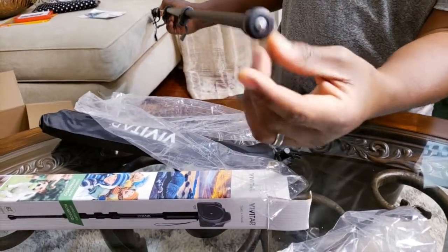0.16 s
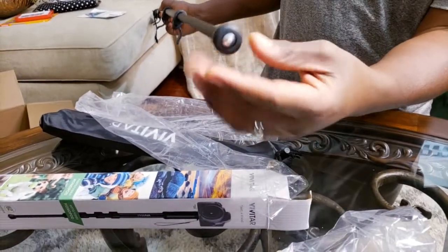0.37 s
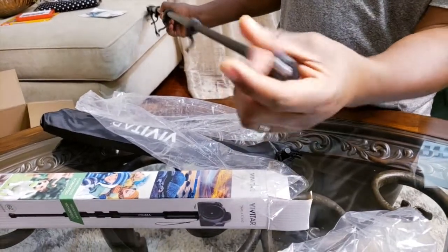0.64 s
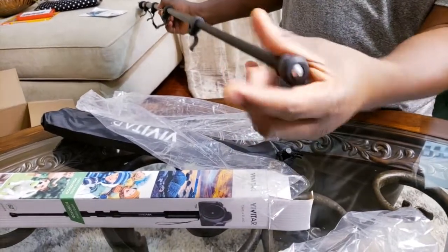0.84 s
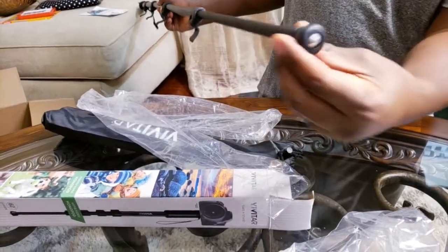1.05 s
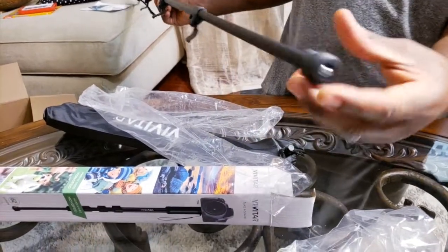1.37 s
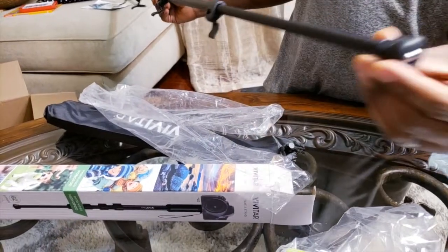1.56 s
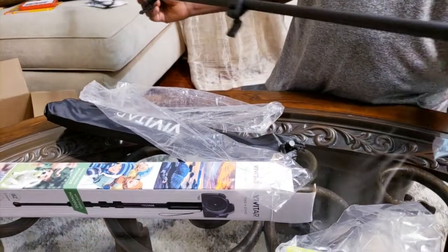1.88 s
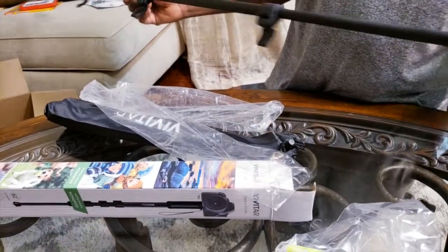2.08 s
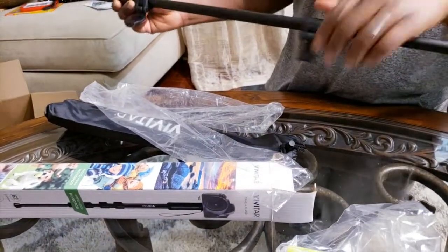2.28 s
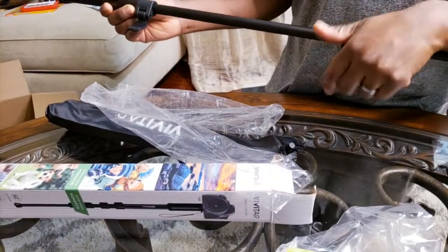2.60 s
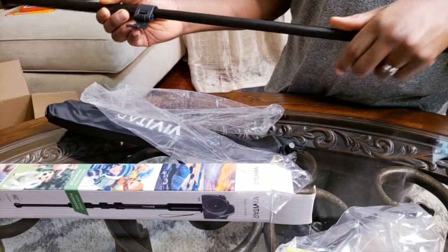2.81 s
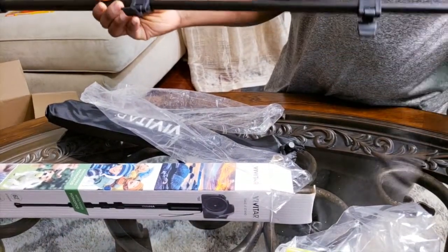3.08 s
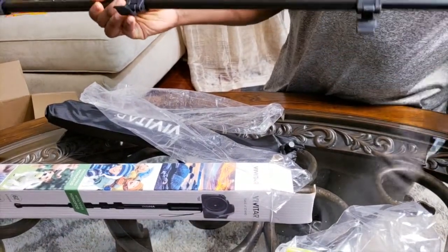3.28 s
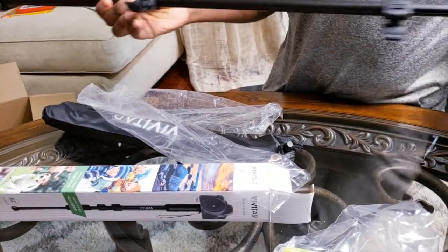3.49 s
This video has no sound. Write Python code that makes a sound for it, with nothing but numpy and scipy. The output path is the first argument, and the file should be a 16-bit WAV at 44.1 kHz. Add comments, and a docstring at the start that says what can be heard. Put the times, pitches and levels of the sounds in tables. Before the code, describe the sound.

Telescoping metal pole handled indoors, clamps clicking and rattling, then a section slides out loudly

```python
"""A furnished room, with a telescoping metal pole handled a little right of a pair of microphones.
Clamps and joints click and chatter: noisy contacts ring short modes. Taps sound the modes of a collar.
One section grinds briefly and fingers brush the tube: slips make noise with flickering resonances.
At last a section slides out with a loud hiss and rasp, and clacks against its stop.
A low hum, a sine with a drone of filtered noise, wavers underneath with quiet room noise."""
import sys
import numpy as np
from scipy import signal
from scipy.fft import rfft, irfft, next_fast_len
from scipy.io import wavfile
from scipy.ndimage import uniform_filter1d, map_coordinates

SR = 44100
rng = np.random.default_rng(int(sys.argv[2]) if len(sys.argv) > 2 else 0)


def transcribe(u):
    """Save the signal u as a 16-bit wav file named by the first command-line argument.

    u: samples, shape (n,) or (channels, n), limited to [-1, 1]; the rate is SR.
    q: integer samples, one column per channel.
    """
    v = np.clip(np.atleast_2d(u).T, -1, 1)
    q = np.round(v * 32767).astype(np.int16)
    wavfile.write(sys.argv[1], SR, q)


N = 160965


def amp(db):
    """Decibels to gain."""
    return 10 ** (np.asarray(db) / 20)


def unit(x):
    """Scaled to rms 1."""
    return x / np.sqrt(np.mean(x ** 2) + 1e-20)


def along(points, hz):
    """(freq_hz, value) points read on a log frequency axis."""
    point_hz, values = np.transpose(points)
    return np.interp(np.log(hz + 1), np.log(point_hz + 1), values)


def levels(rows, outside=None):
    """One gain per sample for each dB column after the time."""
    time_s, *columns = np.transpose(rows)
    t = np.arange(N) / SR
    return [amp(np.interp(t, time_s, column, outside, outside)) for column in columns]


def wobble(rate, size=N):
    """A smooth random curve, rate knots a second up to SR / 5."""
    knots = rng.standard_normal(size // 4)
    return map_coordinates(knots, [np.arange(size) * min(rate / SR, 1 / 5)], mode='wrap')


def pan(db):
    """Left and right gains of constant total power, db apart."""
    return unit(amp([[db / 2], [-db / 2]]))


def filtered(x, response):
    """x times a response of frequency."""
    size = x.shape[-1]
    padded = next_fast_len(size + 4096)
    spectrum = rfft(x, padded) * response(np.fft.rfftfreq(padded, 1 / SR))
    return irfft(spectrum, padded)[..., :size]


def causal(db):
    """The minimum-phase response with this gain, by folding the cepstrum."""
    cepstrum = irfft(np.log(amp(db)))
    half = len(cepstrum) // 2
    cepstrum[1:half] *= 2
    cepstrum[half + 1:] = 0
    return np.exp(rfft(cepstrum))


def resonance(f, hz, width):
    """One damped mode, with unit gain at its centre."""
    return 1j * f * width / (hz * hz - f * f + 1j * f * width)


def noise(spectrum):
    """Steady stereo noise of rms 1."""
    return unit(filtered(rng.standard_normal((2, N)), lambda f: amp(along(spectrum, f))))


def friction(colour, streak_db, rough, slip_rate):
    """Stereo friction of rms 1: tiny slips excite narrow resonances that come and go."""
    slips = rng.standard_normal((2, N)) * np.exp(rough * wobble(slip_rate))
    f, t, z = signal.stft(slips, SR, nperseg=512)
    # partly shared by both ears, smoothed over frequency and then time
    field = rng.standard_normal(z.shape[1:]) + .5 * rng.standard_normal(z.shape)
    field = uniform_filter1d(uniform_filter1d(field, size=3, axis=1), size=9, axis=2)
    streaks = amp(streak_db * unit(field))
    return unit(signal.istft(z * colour(f[:, None], t) * streaks, nperseg=512)[1][:, :N])


def shaped(spectrum):
    """A colour that stays the same over time."""
    return lambda f, t: amp(along(spectrum, f))


# Decay of the furnished room: freq_hz, t60_s
ROOM_DECAY = [(300, 0.39), (2000, 0.16), (5000, 0.18), (9000, 0.16), (15000, 0.15)]
ROOM_BUILD_S = 0.0013


def room(x):
    """A short diffuse tail for each ear; the lowest tones die last."""
    f, t, z = signal.stft(rng.standard_normal((2, SR // 3)), SR, nperseg=256)
    decay = amp(-60 * t / along(ROOM_DECAY, f)[:, None])
    tail = signal.istft(z * decay, SR, nperseg=256)[1]
    tail = tail * (1 - np.exp(-np.arange(tail.shape[1]) / SR / ROOM_BUILD_S))
    tail = tail / np.linalg.norm(tail[0])
    return signal.fftconvolve(np.atleast_2d(x), tail, axes=1)[:, :x.shape[-1]]


# Swells of the low hum: peak_s, level_db
HUM_SWELLS = [(1.02, -72.5), (1.321, -66), (1.92, -61), (2.298, -67.5), (2.491, -62.5), (2.88, -66),
              (3.34, -62.5), (3.58, -68.5)]
# Colour of the noisy drone within the hum: freq_hz, gain_db
DRONE_COLOUR = [(60, -32.5), (130, 4.5), (220, 10), (340, 7), (450, -25), (900, -54)]
# Colour of the quiet room noise: freq_hz, gain_db
ROOM_NOISE_COLOUR = [(25, -30.5), (50, -10.5), (80, 0.5), (200, 4.5), (350, 4), (550, 0), (1500, -4),
                     (4000, -9.5), (9000, -18.5), (15500, -17.5)]
SWELL_S, HUM_REST_DB, HUM_PAN_DB = 0.12, -82, -3.5
HUM_HZ, HUM_WANDER_HZ, SUBHUM_DB, DRONE_DB = 158.8, 0.6, -16, -6.5
FLOOR_DB, FLOOR_SIDE_DB = -74.5, -1


def background():
    """A low hum swells and fades, with a faint lower octave, over quiet room noise."""
    t = np.arange(N) / SR
    swells = sum(amp(db) * np.exp(-((t - s) / SWELL_S) ** 2) for s, db in HUM_SWELLS)
    phase = 2 * np.pi * np.cumsum(HUM_HZ + HUM_WANDER_HZ * wobble(3.6)) / SR
    tone = unit(np.sin(phase))
    drone = amp(DRONE_DB) * noise(DRONE_COLOUR)[0]
    lower_octave = amp(SUBHUM_DB + 3.5 * wobble(3.5)) * np.sin(phase / 2)
    hum = (amp(HUM_REST_DB) + swells) * (tone + drone + lower_octave)
    mid, side = amp(FLOOR_DB) * noise(ROOM_NOISE_COLOUR)
    return hum * pan(HUM_PAN_DB) + mid + amp(FLOOR_SIDE_DB) * np.array([side, -side])


# Strokes of the fingers: start_s, hold_s, level_db, left_minus_right_db, rub_db (relative to the skin)
FINGER_STROKES = [(.505, 0.135, -49.5, 2, -26), (0.552, 0.019, -59, -5, -5), (0.735, 0.063, -55, 5.5, -24),
                  (0.824, 0.083, -61.5, 3, -10), (0.907, 0.2, -48, 2, -12), (1.538, 0.069, -47, -3, -7),
                  (2.004, 0.018, -70.5, 8, -20), (2.218, 0.028, -32, -4, -22.5),
                  (2.258, 0.029, -34.5, -5.5, -21.5), (2.422, 0.011, -54.5, -1, -16),
                  (2.498, 0.061, -61, -13.5, -18), (2.58, 0.14, -54.5, -14.5, -9),
                  (2.689, 0.074, -51, -3, -10.5), (2.781, 0.067, -49.5, -14.5, -17),
                  (3.094, 0.047, -34.5, -9.5, -29.5), (3.13, 0.061, -55.5, -12, -12.5)]
# Colour of the very high skin sound: freq_hz, gain_db
SKIN_COLOUR = [(6000, -43.5), (8800, -22), (9600, -3), (10400, -11), (11400, -1), (13000, 0.5), (15600, 0)]
# Colour of the lower rub: freq_hz, gain_db
RUB_COLOUR = [(1200, -15), (4600, -9.5), (5500, -0.5), (6200, 4.5), (6900, 1), (7800, 0), (8500, -26.5),
              (12000, -33.5)]
BRUSH_ATTACK_S, BRUSH_RELEASE_S = 0.0066, 0.0062


def fingers():
    """Skin brushes the tube in soft, very high strokes, by friction."""
    t, x = np.arange(N) / SR, np.zeros((2, N))
    skin = friction(shaped(SKIN_COLOUR), streak_db=6.0, rough=0.28, slip_rate=1800)
    rub = friction(shaped(RUB_COLOUR), streak_db=3, rough=.4, slip_rate=800)
    for s, hold_s, db, pan_db, rub_db in FINGER_STROKES:
        rise = np.maximum(s - t, 0) / BRUSH_ATTACK_S
        fall = np.maximum(t - s - hold_s, 0) / BRUSH_RELEASE_S
        x += amp(db) * np.exp(-rise - fall) * pan(pan_db) * (skin + amp(rub_db) * rub)
    return x + amp(-7.0) * room(x)


# Loudness of the short grind: time_s, level_db
GRIND_LEVEL = [(.995, -66.5), (1.008, -41.5), (1.037, -34.5), (1.055, -40.5), (1.075, -29), (1.112, -38.5),
               (1.13, -62.5)]
# Colour of the grind: freq_hz, gain_db
GRIND_SPECTRUM = [(80, -72), (800, -28), (1300, -12.5), (2200, -6.5), (2650, 11.5), (3300, -11), (4250, 3),
                  (5200, -7.5), (7000, -6.5), (9000, -10)]
GRIND_PAN_DB = 2


def grind():
    """A section shifts in its collar with coarse slips."""
    level, = levels(GRIND_LEVEL, -np.inf)
    x = level * friction(shaped(GRIND_SPECTRUM), streak_db=3, rough=.5, slip_rate=1200)
    x = x * pan(GRIND_PAN_DB)
    return x + amp(3.0) * room(x)


CRACK_S, CHATTER_ROUGH, LEFT_LAG_S = 0.0026, 0.33, .0001
CLICK_GAIN_DB, CLICK_ROOM_DB = 20, -2


def contact(body, s, db, chatter_s, pan_db):
    """One contact chatters up to a sharp crack and sounds a body (a response of frequency) in the room."""
    size, lead = 16384, 2048  # samples in all, and before the hit
    t, f = (np.arange(size) - lead) / SR, np.fft.rfftfreq(size, 1 / SR)
    envelope = np.exp(-np.abs(t) / np.where(t < 0, max(chatter_s, 1 / SR), CRACK_S))
    force = envelope * rng.standard_normal(size) * np.exp(CHATTER_ROUGH * wobble(3000, size=size))
    force /= np.linalg.norm(force)
    force[lead] += 0.5 * CRACK_S / (CRACK_S + chatter_s)  # a clean snap has one main impact
    hit = rfft(force) * body(f)
    hit *= amp(db + CLICK_GAIN_DB) / np.linalg.norm(irfft(hit))
    ears = np.exp(1j * np.pi * f * LEFT_LAG_S * np.array([[-1], [1]]))
    direct = pan(pan_db) * irfft(hit * ears)
    reflected = amp(CLICK_ROOM_DB) * pan(pan_db / 2) * room(irfft(hit))
    out, start = np.zeros((2, N + 2 * size)), max(round(s * SR), 0)
    out[:, start:start + size] = direct + reflected
    return out[:, lead:lead + N]


TREBLE_EDGE_HZ = 9140  # of the taps and of the joints
# Taps of the hand on a clamp collar:
# hit_s, level_db (before the click gain), chatter_s (rise before the hit), left_minus_right_db
COLLAR_TAPS = [(2.379, -43.5, 0.013, -2), (2.393, -60, 0.0012, 9), (2.7926, -38, .001, 9)]
# Short modes of the collar: freq_hz, width_hz, gain_db
COLLAR_MODES = [(1625, 127, 0.5), (3640, 300, 8), (5570, 310, 0), (6120, 210, -3)]


def taps():
    """Light, dull taps sound the few short modes of a collar."""
    def collar(f):
        modes = sum(amp(db) * resonance(f, hz, width) for hz, width, db in COLLAR_MODES)
        return modes / (1 + (f / TREBLE_EDGE_HZ) ** 10)
    return sum(contact(collar, s, db, chatter_s, pan_db) for s, db, chatter_s, pan_db in COLLAR_TAPS)


# Colour of the broad crack of a joint: freq_hz, gain_db
CRACK_COLOUR = [(100, -55), (750, -34.5), (1150, -23), (1600, -12), (2150, -10), (2700, -1.5), (4300, -0.5),
                (7300, -3.5), (9500, -8.5), (11000, -15), (15500, -12)]
# Ringing modes of the tube: freq_hz, width_hz, gain_db
TUBE_MODES = [(1663, 24, 6), (2670, 40, 6), (4168, 24, 10), (4307, 40, 13), (4540, 40, 13), (6050, 30, 5)]
BASS_EDGE_HZ, KNOCK_WIDTH_HZ, SECOND_KNOCK_DB = 2000, 120, -11.5


def joint(f, bass_db, treble_db, knock_hz, second_hz, knock_db, ring_db):
    """A clamp or joint: a broad crack, two hollow knocks of its own and the ring of the tube."""
    tube = sum(amp(db) * resonance(f, hz, width) for hz, width, db in TUBE_MODES)
    bass = 1 / (1 + (f / BASS_EDGE_HZ) ** 8)
    treble = 1 - 1 / (1 + (f / TREBLE_EDGE_HZ) ** 20)
    crack = causal(along(CRACK_COLOUR, f) + bass_db * bass + treble_db * treble)
    second_knock = amp(SECOND_KNOCK_DB) * resonance(f, second_hz, 2 * KNOCK_WIDTH_HZ)
    knock = resonance(f, knock_hz, KNOCK_WIDTH_HZ) + second_knock
    return crack * (1 + amp(knock_db) * knock + amp(ring_db) * tube)


# Contacts of clamps and joints:
# hit_s, level_db (before the click gain), chatter_s (rise before the hit), left_minus_right_db,
# bass_db, treble_db, knock_hz, second_knock_hz, knock_db, tube_ring_db
JOINT_CLICKS = [(0.0346, -40, 0.00017, -19, -19, -18, 3700, 7260, -6, -24),
                (0.055, -35.5, 0.027, -4, -13, -4, 2560, 4330, -1, -26),
                (0.058, -33.5, 0.0015, -13, -1, -2, 6180, 4570, 21, -17),
                (.304, -37, 0.0056, -0.5, -10, -3, 4300, 6200, 19, -18),
                (0.315, -36.5, 0.003, -4, -1, -7, 4500, 2600, 7, -1),
                (0.894, -41.5, 0.0026, -13, 4, -17, 2630, 5600, 21, -19),
                (0.913, -40, 0.00033, -4, -7.5, -28, 2440, 4260, 29, -17),
                (1.012, -26, 0.0061, -16, -2, 1, 2800, 6000, 17, -6),
                (1.045, -29, .0003, -20, -18, 1, 2560, 5840, 3, -14),
                (1.061, -22.5, 0.00068, -9, -11, -6, 2687, 6315, 1, -12),
                (1.0759, -19, 0.00026, -1, 2, 4, 2660, 7370, -2, -22),
                (1.0829, -17, 0.00054, 7, 2, 0, 3563, 6893, 9, -7),
                (1.0872, -14, 0.0015, -5, 5.5, -1, 4200, 2635, 0.5, 1),
                (1.093, -21, 0.00033, -20, 15, 8, 2843, 1675, -1, 4),
                (1.097, -23, .0004, 3, 2.5, -2, 1726, 6640, 11.5, -8.5),
                (1.1054, -25, .0005, -7.5, 5, -3.5, 4330, 1601, 16.5, -9),
                (1.2638, -29.5, 0.00028, -11, -4, -13, 4400, 2730, 2, 8),
                (1.308, -31.5, 0.00028, -1.5, -11, -4, 4260, 2510, 25, -4),
                (1.324, -32, 0.013, -0.5, 0, 5.5, 2500, 4200, 1, 7),
                (1.538, -26.5, 0.0069, 1, -1.5, -16, 2570, 4210, 34.5, -18),
                (1.545, -24.5, 0.00077, -0.5, -6, -23.5, 2770, 4300, 35.5, -17.5),
                (1.566, -31, 0.0035, -4, 11, 2, 2830, 4550, 13.5, -7.5),
                (2.2152, -34, .0008, -7.5, 8.5, -3, 2634, 1615, 14.5, -24.5),
                (2.2182, -30, 0.00078, -4.5, 8.5, 7, 3320, 4300, 9.5, -2),
                (3.5409, -22, 0.000064, -19, 5, -12, 6350, 1800, 25, -13),
                (3.551, -26, 0.0004, -14, 8.5, 22.5, 1780, 5650, 17, -27),
                (3.5679, -23, 0.00028, -4.5, 6.5, 0.5, 4330, 7600, 11.5, -32)]


def clicks():
    """Clamps snap, joints rattle and sections strike their stops."""
    x = np.zeros((2, N))
    for s, db, chatter_s, pan_db, *timbre in JOINT_CLICKS:
        x += contact(lambda f: joint(f, *timbre), s, db, chatter_s, pan_db)
    return x


# Loudness of the long slide: time_s, hiss_level_db, rasp_level_db
SLIDE_LEVELS = [(3.21, -59, -74), (3.232, -46, -55), (3.25, -19, -27.5), (3.3, -19, -32),
                (3.345, -18.5, -32.5), (3.405, -22.5, -36), (3.47, -20, -36.5), (3.53, -26.5, -32.5),
                (3.57, -20, -23.5), (3.582, -45, -69), (3.65, -53, -59)]
# Colour of the bright hiss: freq_hz, gain_db
HISS_COLOUR = [(3000, -56), (8000, -9), (8950, -14.5), (9450, 3.5), (10000, -1), (10600, 3.5), (12500, 3),
               (14500, 7), (15800, -7)]
# Colour of the lower rasp: freq_hz, gain_db
RASP_COLOUR = [(1900, -30), (2400, -24), (2750, -4), (4300, 0), (5100, -4.5), (5700, 0.5), (6400, -5),
               (6850, 4), (7300, 4), (8100, -1), (9200, -21), (12000, -28)]
# The rasp's resonances dip and recover as the section runs out: time_s, shift_octaves
RASP_PITCH = [(3.26, 0.036), (3.32, -0.028), (3.375, -0.19), (3.43, 0.033)]
SLIDE_PAN_DB, SLIDE_ROOM_DB = -3.5, -7
# a resonance sinks as the pole lengthens
BEND_START_HZ, BEND_OCTAVES_PER_S, BEND_WIDTH_HZ, BEND_DB = 3530, -1.6, 490, -8.5
BEND_END_S, BEND_FADE_S = 3.385, .025


def slide():
    """A section runs out: bright hiss, a lower rasp and a sinking resonance of the lengthening tube."""
    def shifting(f, t):
        octaves = np.interp(t, *np.transpose(RASP_PITCH))
        return amp(along(RASP_COLOUR, f / 2 ** octaves))

    def bend(f, t):
        elapsed_s = np.maximum(t - SLIDE_LEVELS[0][0], 0)
        bend_hz = BEND_START_HZ * 2 ** (BEND_OCTAVES_PER_S * elapsed_s)
        return np.abs(resonance(f, bend_hz, BEND_WIDTH_HZ)) ** 2

    hiss, rasp = levels(SLIDE_LEVELS, -np.inf)
    x = hiss * friction(shaped(HISS_COLOUR), streak_db=3.8, rough=.25, slip_rate=1500)
    x += rasp * friction(shifting, streak_db=5, rough=.45, slip_rate=500)
    fade = np.exp(-np.maximum(np.arange(N) / SR - BEND_END_S, 0) / BEND_FADE_S)
    x += fade * rasp * amp(BEND_DB) * friction(bend, streak_db=3, rough=.3, slip_rate=500)
    x *= pan(SLIDE_PAN_DB) * amp(0.24 * wobble(150))  # the level flutters slightly
    return x + amp(SLIDE_ROOM_DB) * room(x)


def scene():
    """The pole and the room around it."""
    return clicks() + taps() + grind() + slide() + fingers() + background()


# Colour difference of the two microphones: freq_hz, left_minus_right_db
MICROPHONE_BALANCE = [(2500, -2), (4200, -4), (7500, -6), (12500, -1)]
TOP_HZ = 16050


def record(dry):
    """The two microphones differ a little in colour and keep nothing above the band limit."""
    halves = np.array([[.5], [-.5]])
    coloured = filtered(dry, lambda f: amp(along(MICROPHONE_BALANCE, f) * halves))
    return filtered(coloured, lambda f: np.clip((TOP_HZ - f) / 200 + .5, 0, 1))


dry = scene()
out = record(dry)
transcribe(out)
```